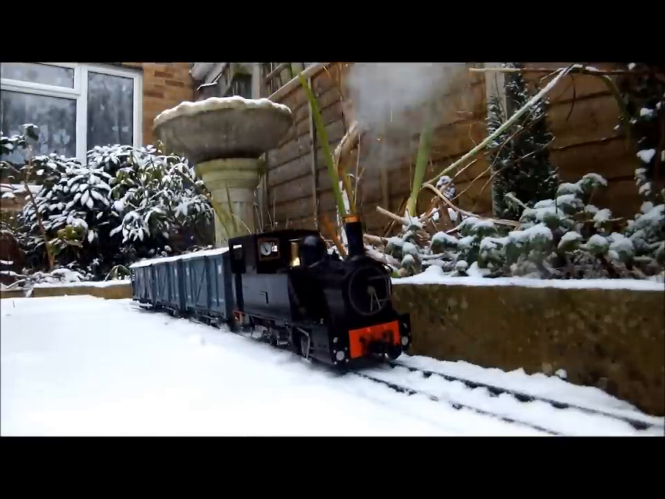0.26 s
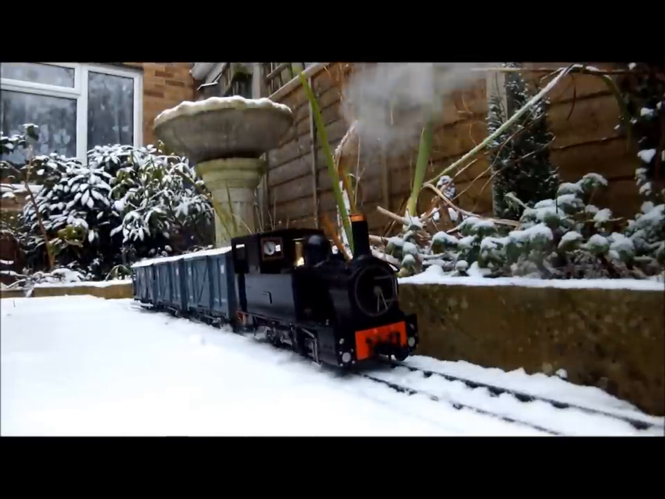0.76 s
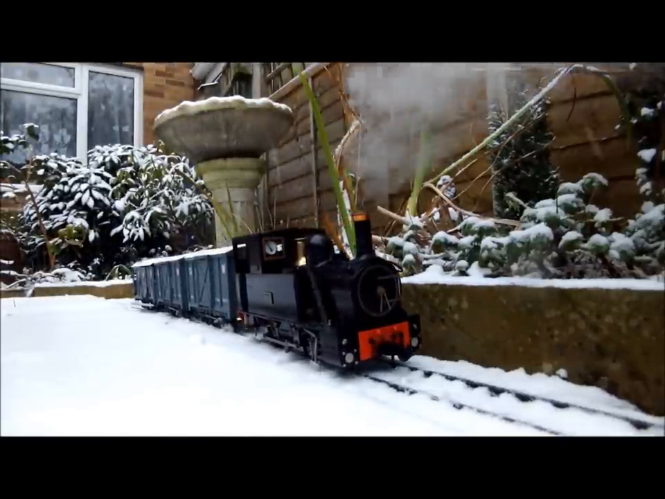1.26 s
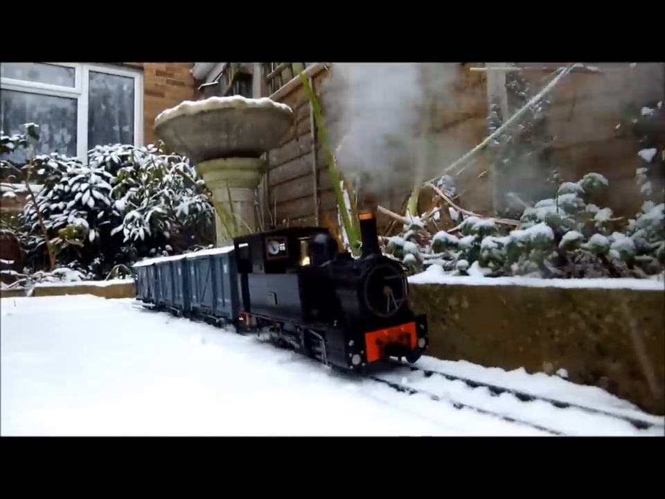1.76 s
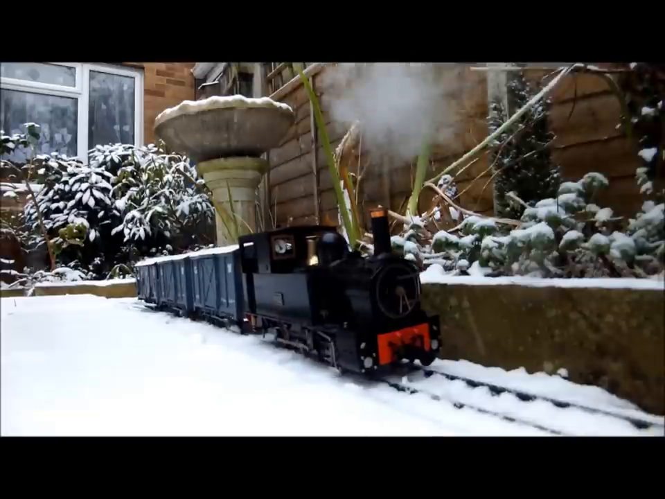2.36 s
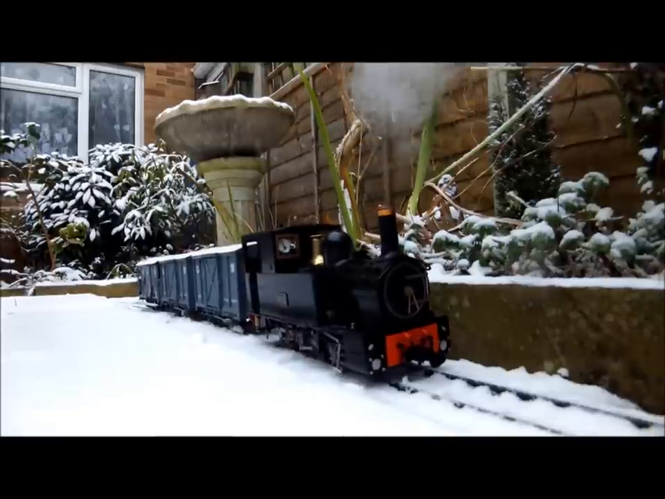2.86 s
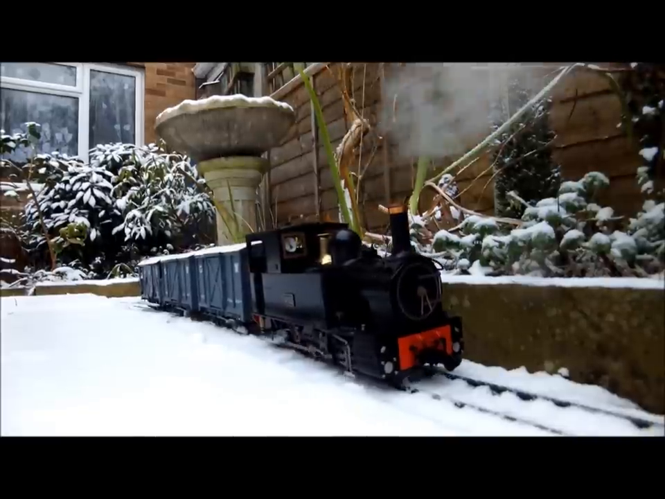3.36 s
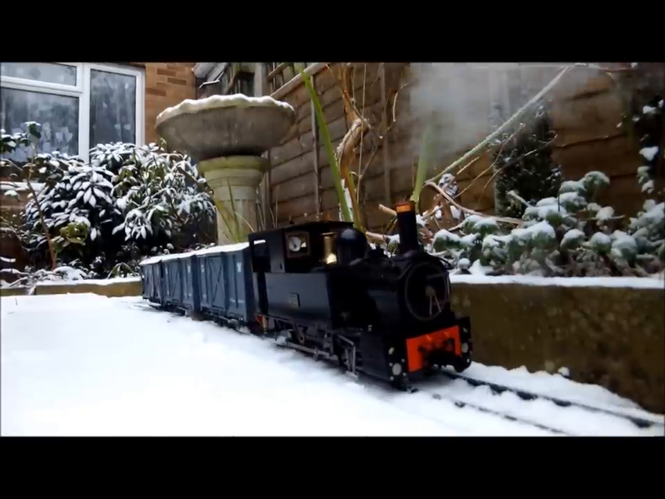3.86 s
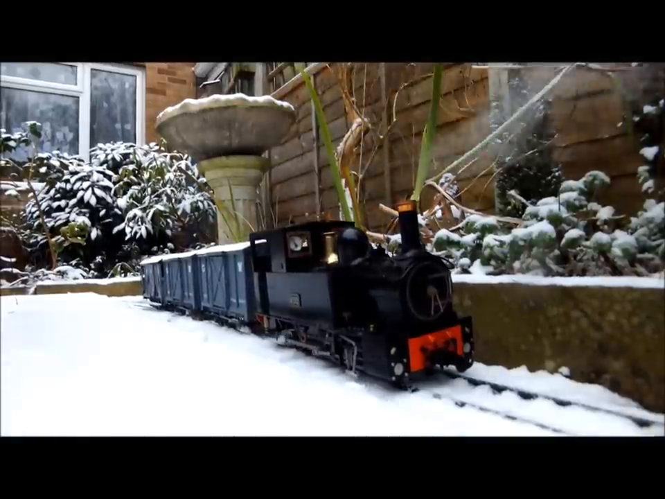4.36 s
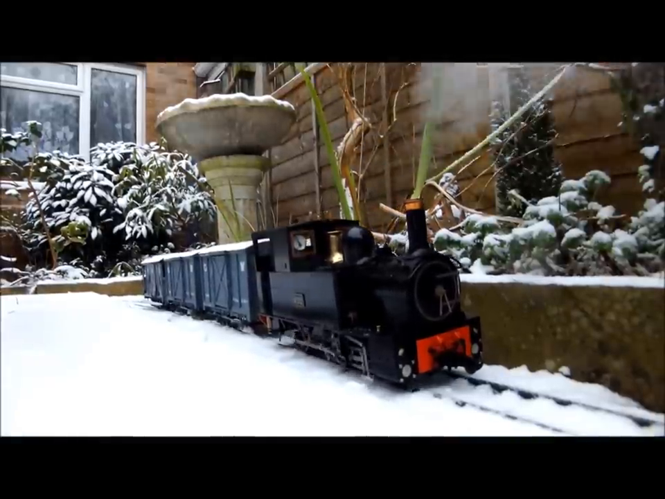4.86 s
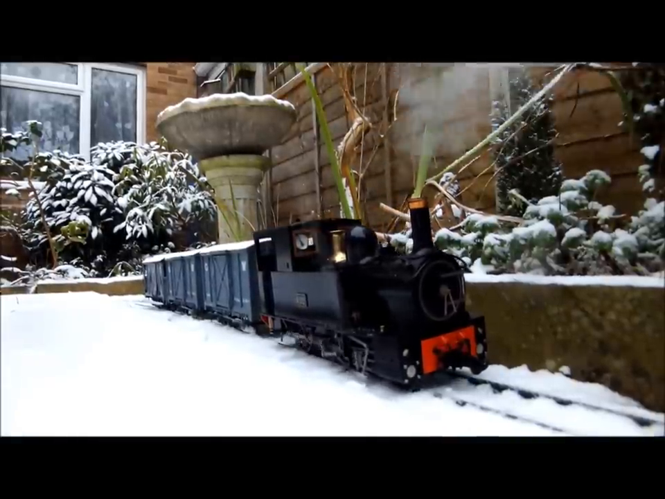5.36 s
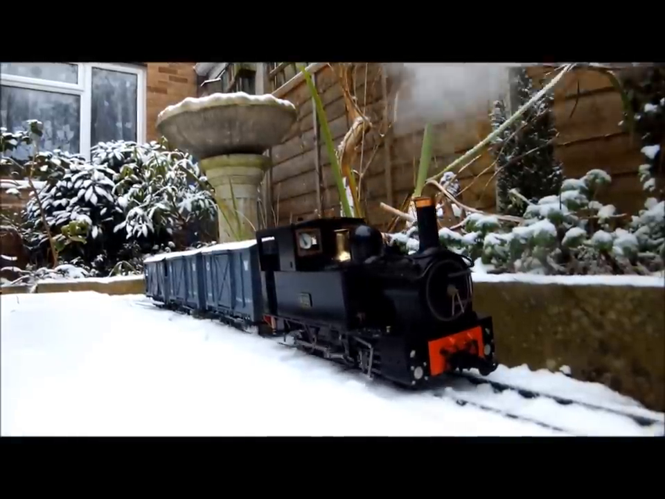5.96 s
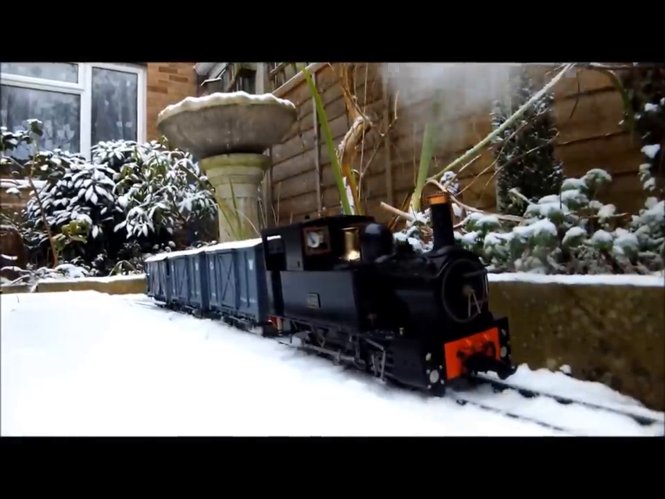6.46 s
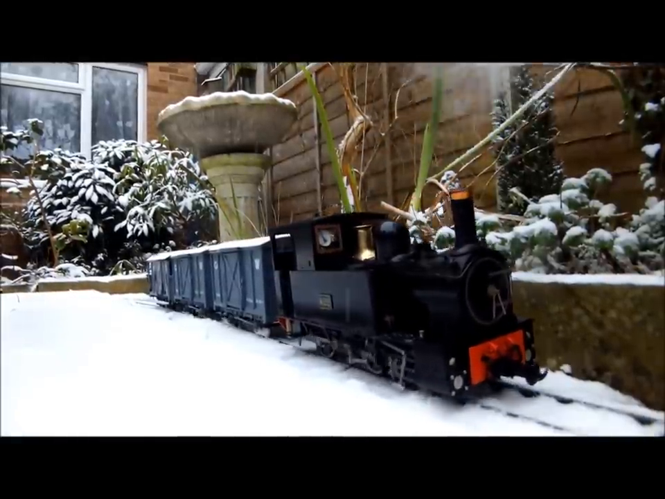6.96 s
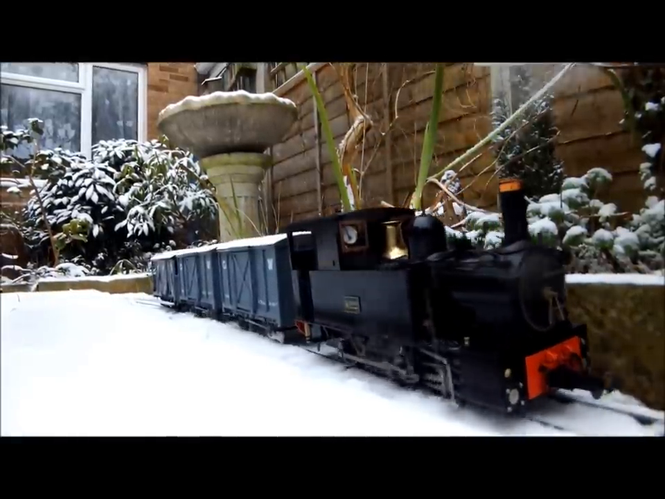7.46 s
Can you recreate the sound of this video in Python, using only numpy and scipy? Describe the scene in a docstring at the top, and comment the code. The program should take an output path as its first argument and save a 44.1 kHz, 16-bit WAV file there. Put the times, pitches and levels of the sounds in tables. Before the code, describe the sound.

Fast wet chuffs from a small live-steam engine, each a short airy jet with a whistly metallic edge. The puffing drags to long hisses, bursts into rapid slipping beats, stalls into plain hiss and roar, then restarts haltingly and quickens. Water crackles and spits in the chimney, and occasional tiny ticks stand out. Steady burner roar and faint outdoor rumble lie underneath; close microphone, open garden, very little reverberation.

```python
"""Small live-steam locomotive in a snowy garden

A model engine creeps nearer along its line, its wheels slipping and twice stalling.
Each exhaust beat is a jet of wet steam (shaped noise) that rings the chimney; water spits in it.
Separate bright clicks tick now and then.
Underneath, the gas burner roars in the flue, a little steam leaks all the time, and the outdoors rumbles.
"""
import sys
import numpy as np
from scipy import signal
from scipy.fft import rfft, irfft
from scipy.io import wavfile
from scipy.ndimage import map_coordinates

SR = 44100
rng = np.random.default_rng(int(sys.argv[2]) if len(sys.argv) > 2 else 0)


def wrap_up_sound(samples):
    """Save the sound to the file named by the first command line argument, as 16-bit audio."""
    columns = np.atleast_2d(samples).T
    # keep every value between -1 and 1, then stretch to whole-number steps
    tamed = np.clip(columns, -1, 1)
    steps = np.round(tamed * 32767).astype(np.int16)
    wavfile.write(sys.argv[1], SR, steps)


N = 340011
TIME = np.arange(N) / SR
FREQS = np.maximum(np.fft.rfftfreq(N, 1 / SR), 1)

# How the engine draws near. Each row: time in seconds, closeness from 0 (afar) to 1 (close by).
APPROACH = [(0, 0.01), (1.5, 0.1), (2.5, 0.1), (3.7, 0.54), (4.3, 0.95), (7.7, 1)]
# Tones at which the chimney rings.
# Each row: pitch in Hz, width in Hz, strength from afar in relative dB, strength close by in relative dB.
CHIMNEY_MODES = [(2320, 320, -23.5, -22), (2995, 290, -32, -7.5), (3255, 158, 4.5, 2), (3450, 89, -2.5, -3),
                 (3770, 300, -11.5, -6.5), (4430, 400, -15, -16.5), (6440, 380, -7, -11.5),
                 (7014, 660, -14, -7.5), (8160, 510, -15.5, -10.5), (9230, 890, -7.5, -8.5),
                 (9840, 470, -9, -6.5), (12000, 320, -37, -15), (13400, 760, -21, -12.5)]


def from_db(db):
    """Turn decibels into a gain."""
    return 10 ** (np.asarray(db) / 20)


def rms_one(x):
    """Scale a signal to an average (rms) level of 1."""
    return x / np.sqrt(np.mean(x ** 2) + 1e-20)


def in_time(rows):
    """Join the points of each column with straight lines, giving a value at every sample."""
    seconds, *columns = np.transpose(rows)
    return [np.interp(TIME, seconds, column) for column in columns]


def slope(points):
    """Power spectrum drawn through (Hz, dB) points."""
    hz, db = np.transpose(points)
    return from_db(np.interp(np.log(FREQS), np.log(hz), db)) ** 2


def resonances(modes):
    """Power spectrum of steep-sided resonances, each given as (Hz, width in Hz, dB)."""
    return sum(from_db(db) ** 2 / (1 + ((FREQS - hz) / width) ** 2 * 2) ** 2 for hz, width, db in modes)


def noise(power):
    """Random turbulence with a given power spectrum, at rms 1."""
    white = rfft(rng.standard_normal(N))
    return rms_one(irfft(white * np.sqrt(power), N))


def drift(rate_hz):
    """Random wandering with spread 1, mostly slower than the given rate."""
    return noise(1 / (1 + (FREQS / rate_hz) ** 2) ** 2)


def impulses(rows):
    """One single-sample click for each (seconds, dB) row."""
    out = np.zeros(N)
    for seconds, db in rows:
        out[int(seconds * SR)] += from_db(db)
    return out


def outdoor_rumble():
    """Low outdoor noise, strongest in the deep bass."""
    # Each row: frequency in Hz, level in relative dB.
    spectrum = [(15, -14), (25, -8), (38, -7), (60, -4.5), (100, -7.5), (200, -23), (600, -39), (4000, -70)]
    return from_db(-57) * noise(slope(spectrum))


def garden(x, t60_s):
    """Fence and shrubs scatter the sound into a brief tail of shaped noise that dies by 60 dB in t60_s."""
    # Colour of the scatter. Each row: frequency in Hz, level in relative dB.
    colour = [(100, 0.5), (700, 3), (1300, -31), (2400, 4), (8000, 5.5), (15000, -17)]
    fade = from_db(-60 * TIME / t60_s)
    tail = noise(slope(colour)) * fade * (TIME > .006)   # starts 6 ms late
    tail /= np.sqrt(np.sum(tail ** 2))
    return signal.fftconvolve(x, tail[:SR // 2])[:N]


def pipe_noise(modes, hiss):
    """Jet noise in a pipe, blended from a far colour to a near one as the engine approaches."""
    near = np.clip(in_time(APPROACH)[0], 0, 1)
    far_modes = [(hz, width, far_db) for hz, width, far_db, close_db in modes]
    near_modes = [(hz, width, close_db) for hz, width, far_db, close_db in modes]
    far_noise = noise(slope(hiss) + resonances(far_modes))
    near_noise = noise(slope(hiss) + resonances(near_modes))
    return np.sqrt(1 - near) * far_noise + np.sqrt(near) * near_noise


def burner(roar_level_db, upper_level_db, flutter_db, surge_db):
    """The gas flame roars, surges and flutters, and the flue resonates with it."""
    # Each row: time in seconds, then flame roar, low flue and upper flue, all in dB.
    levels = [(0.0, -41, -45, -52), (1.0, -42, -42.5, -50.5), (1.74, -40.5, -40, -47),
              (2.0, -43, -45.5, -51.5), (2.75, -42, -42.5, -49), (3.5, -42, -46.5, -46.5),
              (4.25, -40, -41.5, -45.5), (4.62, -37.5, -39, -40), (4.72, -40, -45, -46),
              (5.05, -39, -41, -43.8), (6.35, -38.5, -42.5, -42.5), (6.52, -40.5, -44, -43),
              (7.0, -39.5, -43.5, -42.5), (7.71, -42.5, -48.5, -43)]
    # Roar of the flame. Each row: frequency in Hz, level in relative dB.
    roar_spectrum = [(50, -33), (100, -13.5), (150, -5.5), (200, -1), (270, 0.5), (370, -4.5), (460, -3),
                     (550, -6), (680, -5.5), (780, -8), (950, -10), (1500, -29), (1900, -33), (3000, -51)]
    # Low and upper flue tones. Each row: pitch in Hz, width in Hz, strength in relative dB.
    low_modes = [(790, 63, -5), (857, 55, -1)]
    upper_modes = [(1093, 85, -1), (1318, 72, 3), (1400, 200, -1)]
    flame_db, low_db, upper_db = in_time(levels)
    roar = from_db(flame_db + roar_level_db) * noise(slope(roar_spectrum))
    low_ring = from_db(low_db) * noise(resonances(low_modes))
    upper_ring = from_db(upper_db + upper_level_db) * noise(resonances(upper_modes))
    wander_db = flutter_db * drift(rate_hz=29) + surge_db * drift(rate_hz=2.3)
    return (roar + low_ring + upper_ring) * from_db(wander_db)


def draught(flutter_db):
    """Hot gas and leaking steam hiss up the chimney all the time, with a fast flutter."""
    # Each row: time in seconds, level in dB before flutter.
    levels = [(0, -38.5), (1.0, -33), (1.5, -37), (2.4, -36.5), (3.6, -38), (4.3, -39.5), (5.0, -34.5),
              (6.6, -38), (7.7, -43.5)]
    # Each row: pitch in Hz, width in Hz, strength from afar and strength close by, both in relative dB.
    modes = [(2245, 200, -8, -9.5), (2608, 83, -1, 1), (3005, 180, -3.5, 2), (3220, 140, 4, 2),
             (4240, 660, -5.5, -6.5), (6270, 230, 3, 0), (6700, 350, 1.5, -28), (8000, 590, -16, -14),
             (9560, 810, -11, -9), (11800, 280, -4, -18), (13200, 630, -12, -14)]
    # Each row: frequency in Hz, level in relative dB.
    hiss = [(1000, -25), (2000, -35.5), (3500, -15), (5500, -15), (10600, -19), (12000, -22), (15500, -24)]
    level_db = in_time(levels)[0] + flutter_db * drift(rate_hz=130)
    return from_db(level_db) * pipe_noise(modes, hiss)


def reflected(x):
    """Short echoes off boiler, snow and wall slide as the engine moves, and comb the hiss."""
    # Each row: delay from afar in seconds, delay close by in seconds, level relative to direct sound in dB.
    echoes = [(.00106, 0.001095, -38), (.00125, 0.00163, -36), (.00205, .0019, -30), (.0039, .0033, -17)]
    near = in_time(APPROACH)[0]
    out, power = x, 1
    for far_s, close_s, db in echoes:
        delay = far_s + (close_s - far_s) * near
        out = out + from_db(db) * map_coordinates(x, [(TIME - delay) * SR], order=3)
        power += from_db(db) ** 2
    return out / np.sqrt(power)


def chimney_ring(push):
    """The chimney's resonances answer a sudden push and die away, narrow ones slowest."""
    out = np.zeros(N)
    for k, (hz, width, far_db, close_db) in enumerate(CHIMNEY_MODES):
        r = np.exp(-np.pi * width / SR)
        ring = signal.lfilter([1, 0, -1], [1, -2 * r * np.cos(2 * np.pi * hz / SR), r * r], push)
        sign = (-1) ** k   # neighbouring tones push opposite ways
        out += sign * from_db(far_db) * (1 - r * r) / 2 * ring
    return out


def ticks(hz, fade_s, snap_db, body_db):
    """Dry, very bright clicks die within a millisecond, with a light ring at the chimney's pitches."""
    # Each row: time in seconds, strength in relative dB.
    tick_list = [(1.5775, -8), (1.604, -27), (1.633, -14), (1.651, -15), (4.252, -27), (4.604, -21),
                 (6.333, -15), (6.347, -22), (6.4318, -6)]
    r, w = np.exp(-1 / (fade_s * SR)), 2 * np.pi * hz / SR
    clicks = impulses(tick_list) + 1e-18   # tiny offset keeps the filters quick
    snap = signal.lfilter([1, -1], [1, -2 * r * np.cos(w), r * r], clicks)
    return from_db(snap_db) * snap + from_db(body_db) * chimney_ring(clicks)


def spits(flow, drop_db, burst_s):
    """Water drops burst in the blast pipe: a few milliseconds of spray that ring the chimney."""
    # Wetness of the steam. Each row: time in seconds, random drops per second.
    wetness = [(0, 22), (1.6, 16), (2.0, 110), (3.0, 43), (4.5, 29), (5.05, 90), (5.5, 30), (7.7, 30)]
    # Extra spits at set times. Each row: time in seconds, strength in relative dB.
    spit_list = [(1.6754, -4), (1.863, -1.5), (2.1824, -11), (2.3042, -26), (2.9567, -2), (3.039, -6),
                 (3.4635, -16), (3.7398, -13), (4.9124, -17), (4.9784, -2.5), (5.022, -12), (5.0744, -5),
                 (5.1061, -2), (5.1355, -1), (5.2101, -1)]
    born = rng.random(N) < in_time(wetness)[0] / SR
    size_db = drop_db + np.clip(rng.standard_normal(N), -2, 1)
    drops = born * from_db(size_db) * (flow + 0.003)   # stronger flow, stronger drops
    bursts = drops + impulses(spit_list) + 1e-18
    spray = signal.lfilter([1], [1, -np.exp(-1 / (burst_s * SR))], bursts)
    return chimney_ring(spray * rng.choice([-1, 1], N))


def steam_flow(lap_s, closing_s):
    """The port opens, the cylinder empties, and the port shuts as the next one opens."""
    # Each row: start in seconds, level in relative dB, time for the flow to fall to about a third in seconds.
    beats = [(-0.007, -24, 0.048), (0.076, -24, 0.066), (0.154, -23.5, 0.035), (0.224, -24.0, 0.04),
             (0.342, -22.5, 0.066), (0.458, -24, 0.121), (0.546, -23, 0.084), (0.632, -23, 0.053),
             (0.743, -23.5, 0.071), (0.848, -24.5, 0.12), (0.951, -25.5, 0.16), (1.119, -24, 0.15),
             (1.644, -24, 0.2), (1.82, -24, 0.11), (1.905, -22, 0.074), (1.969, -23.6, 0.042),
             (2.035, -22.5, 0.034), (2.109, -22.5, 0.047), (2.164, -23.3, 0.062), (2.226, -21.5, 0.036),
             (2.284, -23, 0.029), (2.374, -23.5, 0.081), (2.466, -23, 0.078), (2.541, -22, 0.049),
             (2.623, -22, 0.035), (2.708, -23.5, 0.1), (2.79, -23, 0.054), (2.87, -22, 0.052),
             (2.946, -22.5, 0.038), (3.026, -22.5, 0.056), (3.104, -23, 0.077), (3.178, -22.5, 0.045),
             (3.27, -22, 0.055), (3.377, -23, 0.097), (3.456, -23, 0.14), (3.516, -23.0, 0.037),
             (3.606, -22.5, 0.046), (3.705, -22, 0.062), (3.802, -24.5, 0.12), (3.93, -23.5, 0.086),
             (4.631, -22.5, 0.15), (4.813, -24.0, 0.18), (4.968, -26.5, 0.499), (5.205, -22.5, 0.085),
             (5.379, -24.5, 0.3), (5.609, -23.1, 0.149), (5.737, -24, 0.23), (5.912, -24.5, 0.15),
             (6.166, -23, 0.1), (6.318, -25.5, 0.32), (6.436, -25, 0.11), (6.522, -23, 0.053),
             (6.655, -22, 0.065), (6.79, -24.5, 0.17), (6.89, -22.9, 0.066), (6.962, -23.5, 0.052),
             (7.069, -23, 0.062), (7.156, -24.5, 0.076), (7.241, -24, 0.092), (7.316, -24, 0.054),
             (7.409, -23, 0.053), (7.492, -24, 0.054), (7.558, -24, 0.083), (7.618, -24.5, 0.052),
             (7.683, -23.5, 0.048)]
    flow = np.zeros(N)
    next_starts = [row[0] for row in beats[1:]] + [2 * TIME[-1]]
    for (start, db, emptying_s), next_start in zip(beats, next_starts):
        # A -23.5 dB beat opens in 20.5 ms; every 2.5 dB more halves that.
        opening_s = .0205 * 2 ** ((-23.5 - db) / 2.5)
        shut = next_start + lap_s
        live = slice(max(int(start * SR), 0), int(shut * SR))
        age = TIME[live] - start
        port = np.clip(age / opening_s, 0, 1) * np.clip((shut - TIME[live]) / closing_s, 0, 1)
        flow[live] += from_db(db) * port * np.exp(-np.maximum(age - opening_s, 0) / emptying_s)
    return flow


def exhaust(flow, level_db, sputter_db, edge_hz, brightening, colour_wander_db):
    """The blast rings the chimney and sputters; a faster jet is brighter, and treble eases as it nears."""
    # Broad hiss of the blast jet. Each row: frequency in Hz, level in relative dB.
    hiss = [(100, -45), (300, -25.5), (900, -26.5), (1800, -26.5), (2600, -20), (5000, -17), (5700, -23.5),
            (8000, -28), (10600, -22), (11200, -15.5), (12500, -17), (14000, -16.5), (15500, -16)]
    jet = pipe_noise(CHIMNEY_MODES, hiss)
    top = irfft(rfft(jet) / (1 + (edge_hz / FREQS) ** 16), N)
    body = jet - top
    speed = flow / np.sqrt(np.mean(flow ** 2))
    treble_db = 2.0 - 3.5 * in_time(APPROACH)[0]   # from 2 dB afar to -1.5 dB close by
    treble_db = treble_db + colour_wander_db * drift(rate_hz=1.7)
    tilt = from_db(treble_db / 2)   # half lifts the top, half lowers the body
    blast = body / tilt + top * tilt * speed ** brightening
    return flow * blast * from_db(level_db + sputter_db * drift(rate_hz=120))


def scene():
    """The engine is straight ahead in stereo, with only a faint, brief scatter at the sides."""
    roar = burner(roar_level_db=0.63, upper_level_db=-0.73, flutter_db=1.55, surge_db=.5)
    leak = draught(flutter_db=1.5)
    flow = steam_flow(lap_s=.02, closing_s=.025)
    water = spits(flow, drop_db=5.5, burst_s=0.0026)
    blast = exhaust(flow, level_db=-0.13, sputter_db=1.0, edge_hz=8100,
                    brightening=0.51, colour_wander_db=2.2)
    steam = reflected(blast + leak + water)
    engine = steam + roar + ticks(hz=10600, fade_s=.00009, snap_db=-2, body_db=3)
    middle = engine + outdoor_rumble()
    # Added on the left and subtracted on the right, this gives width.
    side = from_db(-29.0) * garden(engine, t60_s=0.08) + from_db(-11) * outdoor_rumble()
    return np.array([middle + side, middle - side])


def record(dry):
    """A steep low-pass filter removes the highest treble, above 15650 Hz."""
    low_pass = signal.ellip(12, .1, 90, 15650, fs=SR, output="sos")
    return signal.sosfilt(low_pass, dry)


dry = scene()
out = record(dry)
wrap_up_sound(out)
```